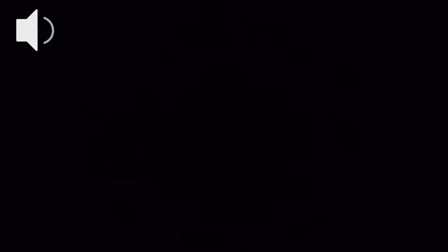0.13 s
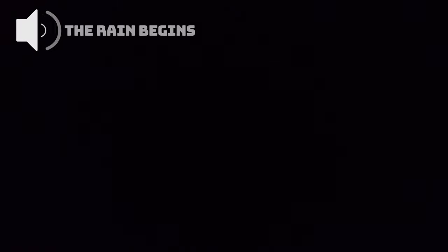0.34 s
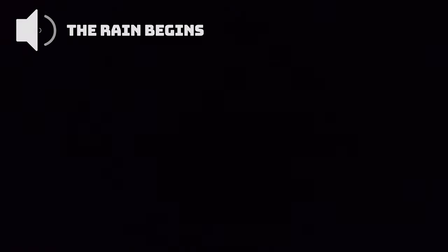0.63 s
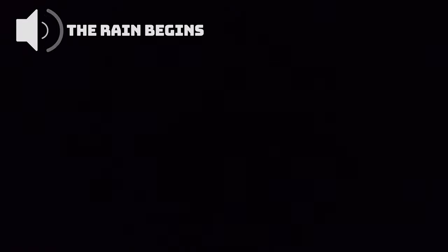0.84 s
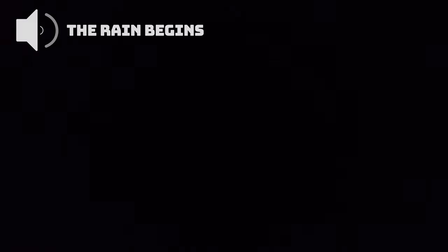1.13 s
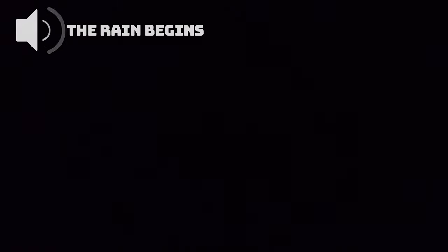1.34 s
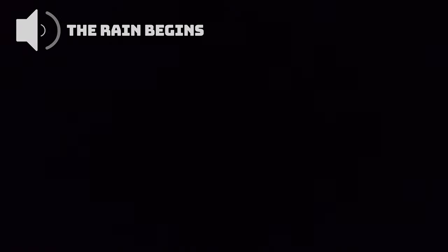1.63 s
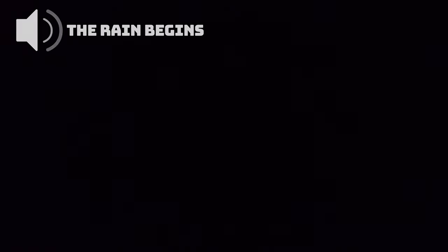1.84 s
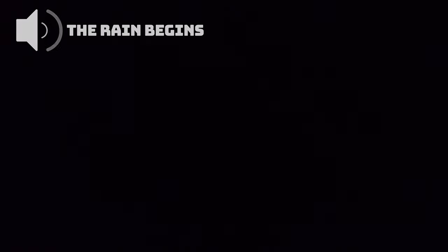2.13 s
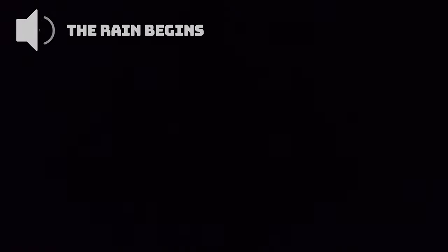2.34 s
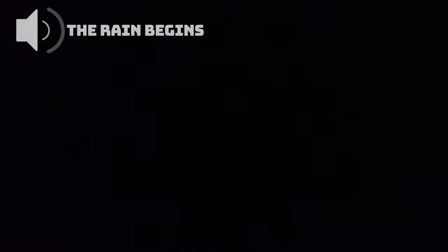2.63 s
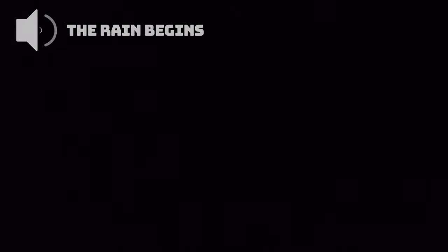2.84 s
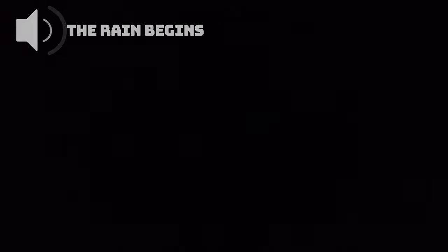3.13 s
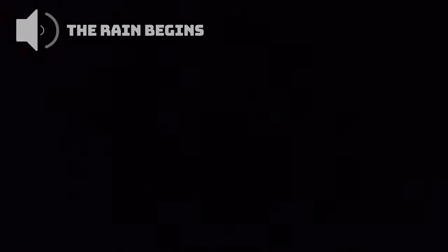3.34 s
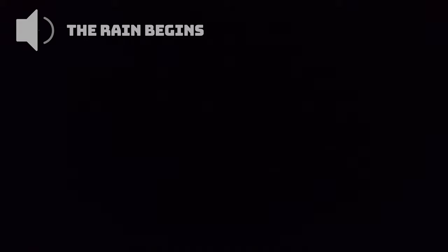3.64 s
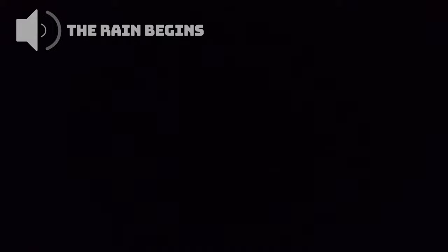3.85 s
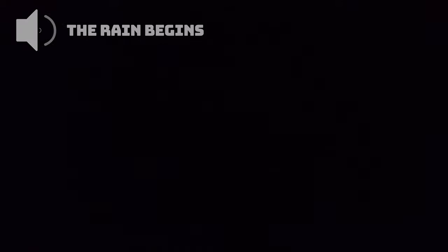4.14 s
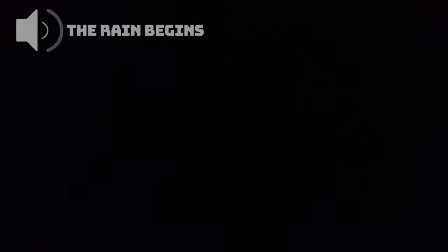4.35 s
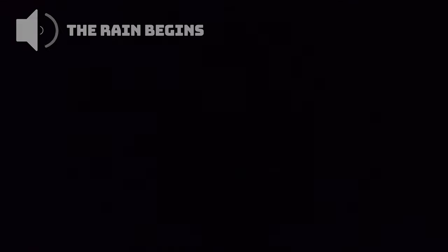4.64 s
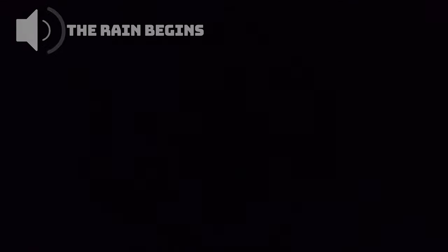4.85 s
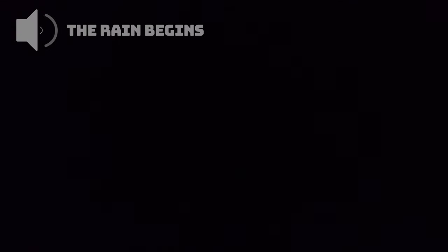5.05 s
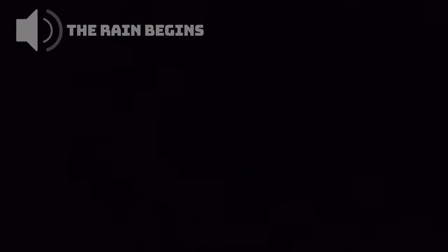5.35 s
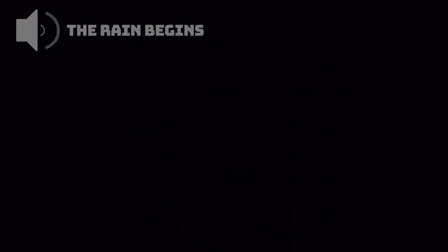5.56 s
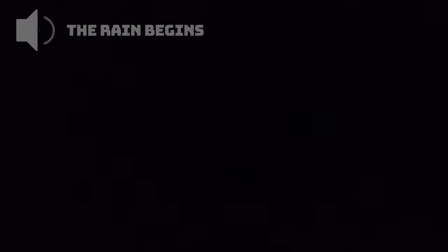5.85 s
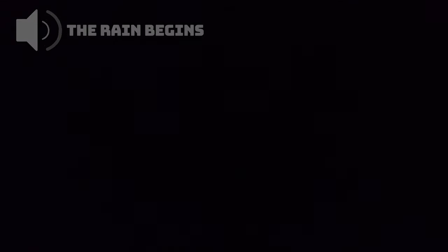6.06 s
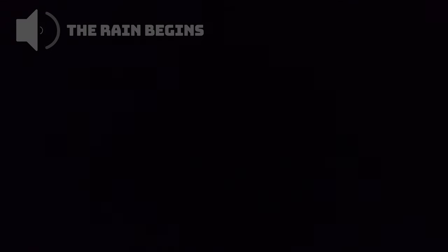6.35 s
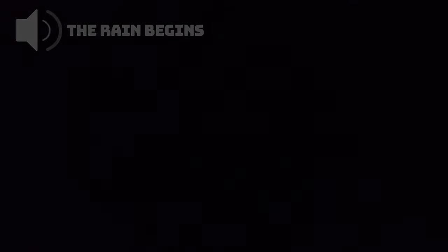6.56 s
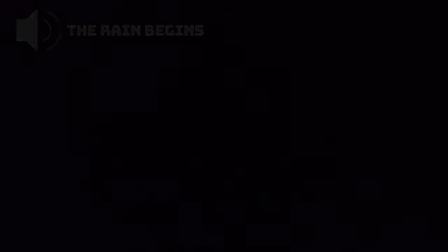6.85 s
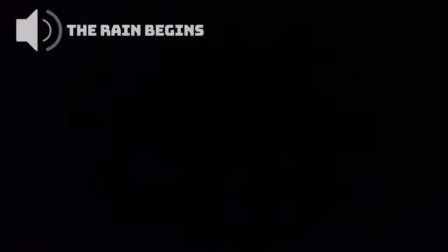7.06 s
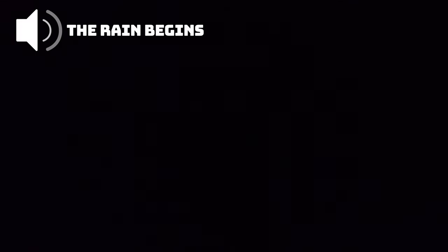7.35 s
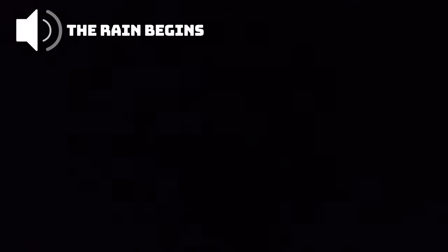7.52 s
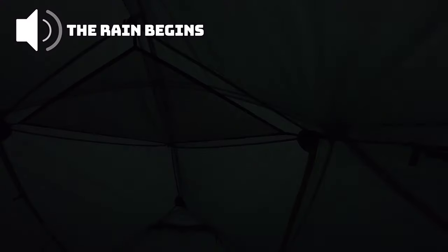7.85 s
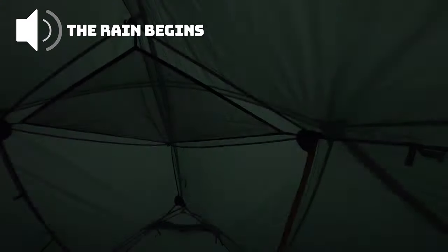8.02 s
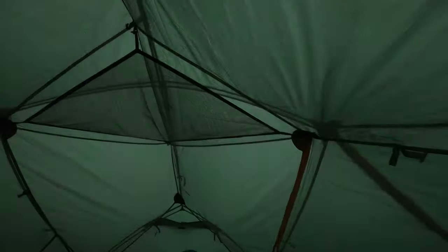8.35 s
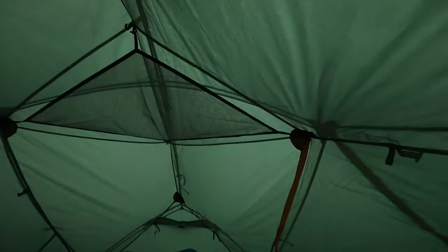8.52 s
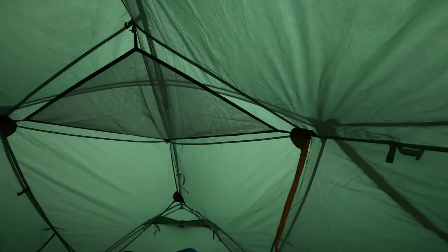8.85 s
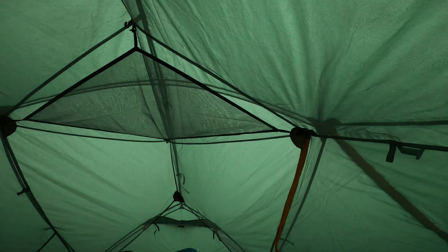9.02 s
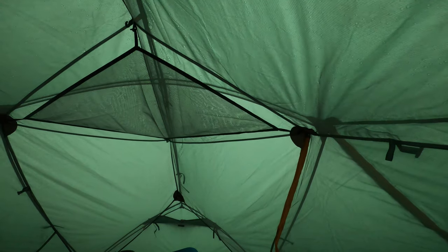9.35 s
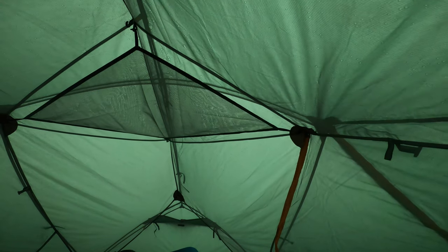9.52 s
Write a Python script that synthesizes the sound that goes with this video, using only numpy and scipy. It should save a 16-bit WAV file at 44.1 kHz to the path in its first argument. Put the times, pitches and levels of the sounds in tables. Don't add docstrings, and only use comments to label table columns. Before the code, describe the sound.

Crisp scattered raindrops patter on tent fabric over a soft far hiss and faint wind rumble, before a fuller, drummier downpour takes over at the end.

```python
import sys
import numpy as np
from scipy import signal
from scipy.fft import rfft, irfft
from scipy.io import wavfile
from scipy.ndimage import uniform_filter1d

SR = 44100
rng = np.random.default_rng(int(sys.argv[2]) if len(sys.argv) > 2 else 0)


def to_linear_factor(level_db):
    exponent = np.asarray(level_db, float) / 20
    return 10 ** exponent


def store_pcm(level_fs):
    pcm = np.round(np.clip(level_fs, -1, 1) * 32767).astype(np.int16)
    wavfile.write(sys.argv[1], SR, np.atleast_2d(pcm).T)


N = 426888
TAP, LEAD = 512, 48

# (time [s], peak [dB], pitch of the struck patch [Hz], left minus right [dB])
LIGHT_DROPS = [(0.0888, -28, 1848, -4), (0.7113, -22.5, 1967, -1.7), (1.1134, -20.5, 2177, 0),
               (1.347, -29, 2937, -3), (1.5943, -26.5, 2650, 1), (1.6732, -26.5, 3453, -1),
               (1.747, -25, 3140, -1), (2, -26, 2420, 0), (2.4093, -19.5, 4226, -4.5),
               (2.4724, -27.5, 2440, -9), (2.6517, -28.5, 2415, -7), (2.7596, -25.5, 2910, -1),
               (3.1393, -26, 3163, -2), (3.386, -22.5, 2688, -1.4), (3.6935, -21.5, 2383, -6.1),
               (3.7455, -27, 3584, -5), (3.7742, -25.5, 3360, -8), (4.5112, -28.5, 2540, -2.8),
               (4.672, -21.5, 2210, -5), (5.134, -23, 2574, -4.5), (5.3152, -25.5, 1960, -8),
               (5.553, -27, 1960, -6), (5.6188, -27, 2539, -6), (6.1166, -25.5, 1800, -2),
               (6.4583, -27, 1540, 3), (6.4683, -25.5, 2948, -2), (6.811, -24.5, 3670, -1),
               (7.2722, -27, 1435, -1), (7.32, -24, 1458, -9), (7.334, -27, 2150, 1)]
# (time [s], peak [dB], pitch of the struck patch [Hz])
MIDDLING_DROPS = [(0.233, -29, 2850), (0.461, -31, 3330), (0.569, -30.5, 1704), (0.743, -30, 3410),
                  (1.275, -34, 1732), (1.494, -35, 1730), (1.567, -31.5, 1250), (1.945, -28, 2197),
                  (2.093, -33, 1875), (2.382, -27, 2430), (2.574, -29.5, 2422), (2.672, -27, 2620),
                  (2.927, -27.5, 3196), (3.111, -31.5, 1770), (3.194, -26.5, 3040), (3.619, -32, 2540),
                  (3.803, -30.5, 1450), (3.98, -30, 1460), (4.084, -28.5, 2872), (4.381, -36, 3180),
                  (4.557, -33.5, 1703), (4.701, -29, 2286), (4.955, -29.5, 2745), (5.009, -28, 2250),
                  (5.437, -29.5, 2260), (5.742, -26, 2890), (6.337, -36, 1692), (6.603, -33, 3040),
                  (7.147, -29, 2800), (7.651, -30.5, 2130)]
# (time [s], peak [dB], pitch of the struck patch [Hz])
HEAVY_DROPS = [(8.152, -31.5, 1430), (8.2159, -21.5, 2180), (8.2293, -22.5, 2800), (8.245, -26, 2900),
               (8.3441, -29, 1360), (8.4243, -22, 1340), (8.4429, -31, 1470), (8.4884, -33, 1670),
               (8.528, -29, 3100), (8.5555, -32, 1500), (8.5985, -36, 1500), (8.6341, -26.3, 1570),
               (8.6877, -24.5, 1350), (8.7206, -32, 1780), (8.8825, -24, 3030), (8.9496, -24.5, 2170),
               (8.973, -24.0, 1870), (8.9857, -25.4, 1500), (9.0124, -23, 2890), (9.0303, -22, 2060),
               (9.079, -28.5, 1412), (9.1378, -30, 1120), (9.1662, -22.5, 1310), (9.1816, -23, 1100),
               (9.2377, -23, 1230), (9.262, -27.5, 3800), (9.299, -29.5, 1030), (9.4013, -33, 2270),
               (9.4647, -29, 1580), (9.5171, -27.5, 1630)]
# (time [s], level [dB])
LIGHT_PATTER = [(0.0, -46.5), (0.15, -51), (1.1, -54.5), (1.9, -48.5), (2.2, -51), (2.7, -49.5),
                (3.05, -50), (3.7, -49.5), (4.4, -54.5), (4.7, -51), (5.3, -49.5), (6.0, -49.5),
                (6.6, -50.5), (6.9, -52), (7.7, -51.5)]
# (time [s], change [dB])
FLURRIES = [(0.529, -5.5), (0.86, -1.5), (1.073, -3), (1.137, 4.5), (1.181, -5.5), (1.217, 7),
            (1.252, -8.5), (1.287, 1), (1.342, -1.5), (1.695, -0.5), (1.776, 1), (2.3, 3.5), (2.52, -3.5),
            (3.457, 3), (3.547, -5), (3.831, -3.5), (3.911, -1), (4.19, 0.5), (4.245, 4), (4.34, -7.5),
            (4.495, -6), (4.654, -1), (4.975, 3), (5.074, -6.5), (5.433, -4.5), (5.607, -5), (5.757, 0.5),
            (6.376, 5.5), (7.571, -6), (7.707, -3.5)]
# (time [s], level [dB])
HEAVY_PATTER = [(8.2, -49), (8.4, -46.5), (8.95, -47.5), (9.18, -47), (9.55, -45.5), (9.68, -54)]
# (time [s], share of the light rain [0..1])
LIGHT_FADE = [(7.6, 0.98), (8.0, 0.75), (8.4, 0.53), (8.7, 0.11)]
# (time [s], share of the heavy shower [0..1])
BLEND = [(7.65, 0.), (7.9, 0.23), (8.05, 0.71), (8.3, 0.84)]
# (frequency [Hz], gain [dB])
LIGHT_FABRIC = [(240, -36), (420, -10.5), (847, -8), (1030, -2), (2920, -2), (7550, -12), (8280, -20),
                (12300, -30.5), (15500, -58)]
# (frequency [Hz], gain [dB])
HEAVY_FABRIC = [(76, -13), (130, -16), (156, -10.5), (313, -1.5), (595, -6.5), (756, -1), (1300, 1.5),
                (2140, -8), (3670, -8), (7850, -29), (9780, -29.5), (12700, -49), (15500, -49)]
# (frequency [Hz], density [dB per Hz])
LIGHT_WASH = [(210, -45), (350, -8.5), (824, -10), (1030, -11.5), (1240, -5), (3170, -4), (7590, -13.5),
              (8900, -23), (12200, -30), (15500, -37)]
# (frequency [Hz], density [dB per Hz])
HEAVY_WASH = [(76, -52), (130, -29), (301, -9), (583, -13), (1220, 3.5), (2010, 3.5), (3260, 1),
              (9980, -19), (12700, -21.5), (15500, -38)]
# (frequency [Hz], likeness [0..1])
LIGHT_SAME = [(350, 0.24), (1500, 1), (4000, 1), (9000, 0.099)]
# (frequency [Hz], likeness [0..1])
HEAVY_SAME = [(130, .99), (640, 1), (2500, 1), (6800, .99), (10500, .99), (12500, .6)]
# (frequency [Hz], left minus right [dB])
LIGHT_BALANCE = [(60, 1), (110, -10), (200, -9), (380, -3), (700, -2.0), (1290, -0.5), (2380, 1),
                 (4400, 0.5), (8120, -6.5), (15000, 2)]
# (time [s], peak [dB], hold [s])
PUFFS = [(0.12, -66.5, .45), (0.98, -71, .03), (1.428, -50, .03), (1.721, -61, .15), (2.8, -57, 0.087),
         (3.298, -75, 0.028), (3.701, -67, 0.22), (4.75, -63.5, 0.32), (5.242, -53, .02),
         (5.499, -65.5, 0.32), (6.42, -66, 0.46), (7.231, -50, 0.25), (7.679, -51, 0.17), (8.0, -56, .1),
         (8.27, -54, 0.11), (9.35, -75, .03)]
# (frequency [Hz], density [dB per Hz])
WIND_COLOUR = [(8, 14), (30, 13.5), (50, 1.5), (70, -18), (100, -19), (200, -81)]
# (time [s], peak [dB], pitch [Hz], 60 dB decay [s], left minus right [dB])
BUMPS = [(.54, -69, 71.4, .08, -10), (1.5, -57, 75.2, 0.081, 1), (3.29, -63, 69.8, .08, -2),
         (4.961, -58, 79.9, 0.07, -12), (5.228, -51, 59.8, 0.11, -17), (5.79, -61, 70.1, .08, -4),
         (6.93, -55, 111.7, 0.041, -5), (7.706, -47, 298.5, 0.015, -11), (7.772, -48, 278.2, 0.018, -1),
         (7.962, -44, 228, 0.037, -3), (8.431, -60, 75, .08, -4)]
# (time [s], level [dB])
RUMBLE = [(0.0, -72), (1.41, -65.5), (3.2, -69.5), (3.6, -65.5), (4.35, -69.5), (4.8, -63), (5.64, -69.5),
          (6.0, -62), (7.61, -73.5), (8.3, -54.5)]
# (frequency [Hz], density [dB per Hz])
RUMBLE_COLOUR = [(70, -13), (110, -25), (150, -1.5), (300, -5), (400, -12), (600, -52)]
# (frequency [Hz], level [dB per bin])
GATE = [(12700, -200), (12900, -103), (14300, -106.5), (15000, -107), (15700, -111)]


def evened(x):
    return x / np.sqrt(np.mean(x ** 2) + 1e-20)


def read(points, hz):
    f, value = np.transpose(points)
    return np.interp(np.log(hz + 1), np.log(f + 1), value)


def curve(rows, t):
    return np.interp(t, *np.transpose(rows))


def tilted(x, db_at_hz):
    return irfft(rfft(x) * to_linear_factor(db_at_hz(np.fft.rfftfreq(N, 1 / SR))), N)


def causal(db):
    fold = np.r_[1, 2 * np.ones(TAP // 2 - 1), 1, np.zeros(TAP // 2 - 1)]
    cepstrum = irfft(np.maximum(db, -100) * np.log(10) / 20, axis=-1)
    return rfft(cepstrum * fold, axis=-1).imag


def strikes(s, peak_db, patch_hz, pan_db, fabric, boost_db, spread, snap_db, sudden, buzz_db,
            echo_db, t60, apart, lag, scatter):
    hz, t = np.fft.rfftfreq(TAP, 1 / SR), np.arange(TAP) / SR
    side, snap = rng.standard_normal((len(s), 2, 1)).transpose(1, 0, 2)
    octaves = np.log2((hz + 1) / patch_hz[:, None])
    gain_db = read(fabric, hz) + boost_db * np.exp(-.5 * (octaves / spread) ** 2)
    gain_db += snap_db * snap * np.clip(octaves, 0, 2)
    dent = -to_linear_factor(gain_db) * np.exp(1j * sudden * causal(gain_db))

    shared, left, right, hit = rng.standard_normal((len(s), 4, TAP)).transpose(1, 0, 2)
    buzz = to_linear_factor(buzz_db - 60 * t / 0.0053)
    walls = (hit > 1.2) * to_linear_factor(echo_db - 60 * t / t60)
    echoes = (shared + apart * np.array([left, right])) * (buzz + walls)
    echoes[..., 0] = 1

    late = np.array([lag + scatter * side, 0 * side]) + LEAD
    pulses = irfft(dent * rfft(echoes) * np.exp(-2j * np.pi * hz * late / SR))
    pan = to_linear_factor(np.array([pan_db / 2, -pan_db / 2]))[..., None]
    pulses *= signal.windows.tukey(TAP, .2) * pan
    pulses *= (to_linear_factor(peak_db) / abs(pulses.mean(0)).max(-1))[:, None]
    at = (np.round(s * SR).astype(int)[:, None] + np.arange(TAP)).ravel()
    return np.array([np.bincount(at, p.ravel(), N + TAP)[LEAD:N + LEAD] for p in pulses])


def patter(t0, t1, count, size_db, low_hz, high_hz, pan_db):
    when, size, pitch, side = rng.random((count, 4)).T
    s = t0 + (t1 - t0) * when
    peak_db = -size_db * np.log(0.071 + size)
    patch_hz = low_hz * (high_hz / low_hz) ** pitch
    return s, peak_db, patch_hz, pan_db * (2 * side - 1)


def gusts(t):
    half_width = 0.017
    brief = sum(db * np.exp(-.5 * ((t - s) / half_width) ** 2) for s, db in FLURRIES)
    return curve(LIGHT_PATTER, t) + brief


def light_rain():
    t = np.arange(N) / SR
    level_db = gusts(t)
    swell_db = level_db - level_db.mean()
    cloth = dict(fabric=LIGHT_FABRIC, boost_db=11., spread=0.52, snap_db=1.4, sudden=0.93, buzz_db=-20.5,
                 echo_db=-20.5, t60=0.067, apart=0.43, lag=1.62, scatter=1.63)
    rounder = dict(cloth, boost_db=8.5, spread=0.62, snap_db=.7, sudden=0.76)
    large_s, db, hz, pan_db = np.transpose(LIGHT_DROPS)
    clear = strikes(large_s, db - .3, hz, pan_db + 1.8, **rounder)

    mid_s, db, hz = np.transpose(MIDDLING_DROPS)
    mid_s = mid_s + .0015
    pan_db = -2.5 + 1.0 + 3.5 * rng.standard_normal(len(hz))
    clear += strikes(mid_s, db - .4, hz, pan_db, **cloth)

    stray = np.array(patter(0, 7.5, count=70, size_db=1.74, low_hz=1500, high_hz=4220, pan_db=3.5))
    stray[1] += -33.5 + 0.26 * swell_db[(stray[0] * SR).astype(int)]
    clear += strikes(*stray, **cloth)

    small = np.array(patter(0, 8.7, count=2900, size_db=5.0, low_hz=1250, high_hz=5650, pan_db=3.5))
    clear_s = np.sort(np.r_[large_s, mid_s])
    wait = np.r_[clear_s, 99][np.searchsorted(clear_s, small[0])] - small[0]
    fine = evened(strikes(*small[:, wait > .006], **cloth))
    chance = uniform_filter1d(uniform_filter1d((fine ** 2).mean(0), size=1500), size=1500)
    fine = evened(fine / (chance + .05) ** .28)

    far = wash(LIGHT_WASH, LIGHT_SAME, lag=2.2, patchy_db=1.5, flicker_db=1.8)
    bed = to_linear_factor(level_db - 0.33) * fine + to_linear_factor(-58.0 + .7 * swell_db) * far
    rain = clear + bed * np.clip(curve(LIGHT_FADE, t), 0, 1)
    return tilted(rain, lambda hz: read(LIGHT_BALANCE, hz) * np.array([[.5], [-.5]]))


def heavy_rain():
    t = np.arange(N) / SR
    cloth = dict(fabric=HEAVY_FABRIC, boost_db=7.0, spread=0.19, snap_db=1.8, sudden=0.74, buzz_db=-12.5,
                 echo_db=-18.0, t60=0.055, apart=0, lag=0, scatter=0)
    s, db, hz = np.transpose(HEAVY_DROPS)
    clear = strikes(s, db - 3.1, hz, 0 * s, **cloth)
    small = patter(7.6, 9.675, count=2300, size_db=5.0, low_hz=517, high_hz=3357, pan_db=-3)
    fine = strikes(*small, **cloth)
    far = wash(HEAVY_WASH, HEAVY_SAME, lag=0, patchy_db=1.5, flicker_db=1.5)
    level = to_linear_factor(curve(HEAVY_PATTER, t)) * np.clip(curve(BLEND, t), 0, 1)
    bed = to_linear_factor(-1.5) * evened(fine.mean(0)) + to_linear_factor(-2.5) * far
    rain = clear.mean(0) + level * bed
    bass_cut = signal.butter(4, 135, "high", fs=SR, output="sos")
    return signal.sosfilt(bass_cut, rain)


def wash(colour, likeness, lag, patchy_db, flicker_db):
    frames, hz = N // 128 + 5, np.fft.rfftfreq(512, 1 / SR)
    a, b, c, d, patches = rng.standard_normal((frames, 257, 5)).T
    patches = evened(uniform_filter1d(uniform_filter1d(patches, size=8, axis=0), size=12, axis=1))
    flicker = evened(uniform_filter1d(rng.standard_normal(frames), size=4))
    flicker = flicker * np.clip(hz / 1000, 0, 1)[:, None]
    same = np.clip(read(likeness, hz), -1, 1)[:, None]
    right = a + 1j * b
    delay = np.exp(-2j * np.pi * hz * lag / SR)[:, None]
    left = same * right * delay + np.sqrt(1 - same ** 2) * (c + 1j * d)
    level_db = read(colour, hz)[:, None] + patchy_db * patches + flicker_db * flicker
    z = np.array([left, right]) * to_linear_factor(level_db)
    return evened(signal.istft(z, nperseg=512, noverlap=384)[1][:, :N])


def low_noise(colour, level_db, own, turn, lumpy_db, right_db):
    both, left, right, lumps = rng.standard_normal((4, N))
    turned = np.real(signal.hilbert(both) * np.exp(1j * turn))
    pair = np.array([turned + own * left, both + own * right])
    lumps = evened(uniform_filter1d(uniform_filter1d(lumps, size=2500), size=2500))
    pair = evened(tilted(pair, lambda hz: read(colour, hz)) * to_linear_factor(lumpy_db * lumps))
    return pair * to_linear_factor(level_db + np.array([[0], [right_db]]))


def wind(t):
    rise, fall, calm_db = 250., 148, -75.5
    shapes = []
    for s, db, hold in PUFFS:
        before, after = np.maximum(s - t, 0), np.maximum(t - s - hold, 0)
        shapes.append(db - rise * before - fall * after)
    level_db = 20 * np.log10(to_linear_factor(calm_db) + to_linear_factor(np.max(shapes, axis=0)))
    return low_noise(WIND_COLOUR, level_db, own=0.58, turn=0, lumpy_db=3.0, right_db=2.5)


def bumps():
    t, out = np.arange(8000) / SR, np.zeros((2, N))
    for s, db, hz, t60, pan_db in BUMPS:
        onset = np.minimum(t / 0.0049, 1)
        knock = to_linear_factor(db - 60 * t / t60) * np.sin(2 * np.pi * hz * t) * onset
        pan = to_linear_factor(np.array([[pan_db / 2], [-pan_db / 2]]))
        out[:, round(s * SR):][:, :len(t)] += 2 * knock * pan
    return out


def distant_roar(t):
    fade = np.clip(1 - curve(BLEND, t), 0, 1)
    return fade * low_noise(RUMBLE_COLOUR, curve(RUMBLE, t), own=0.93, turn=-0.81, lumpy_db=2.35, right_db=3.0)


def scene():
    t = np.arange(N) / SR
    return light_rain() + heavy_rain() + wind(t) + bumps() + distant_roar(t)


def roll_off(x):
    return signal.sosfilt(signal.butter(12, 15000, fs=SR, output="sos"), x)


def record(dry):
    hz, _, z = signal.stft(dry, SR, nperseg=1024)
    power = uniform_filter1d((abs(z) ** 2).mean(0), size=20, axis=0)
    band_db = 10 * np.log10(power + 1e-30)
    band_db += 1.8 * evened(uniform_filter1d(rng.standard_normal(z.shape[-1]), size=6))
    short_db = read(GATE, hz)[:, None] - band_db
    kept = 1 / (1 + np.exp(np.clip(3 * short_db, -30, 30)))
    kept = np.minimum.accumulate(kept, axis=0)
    mix = signal.istft(z * kept, SR, nperseg=1024)[1][:, :N]
    return roll_off(mix)


dry = scene()
out = record(dry)
store_pcm(out)
```